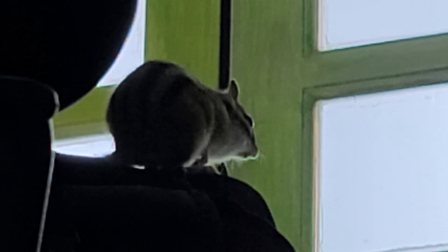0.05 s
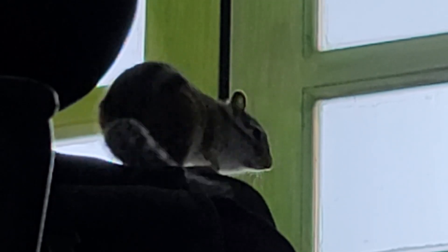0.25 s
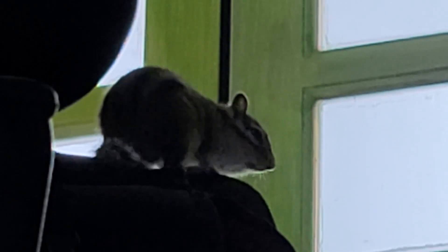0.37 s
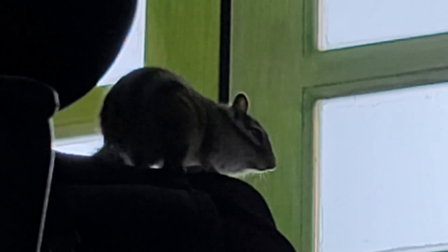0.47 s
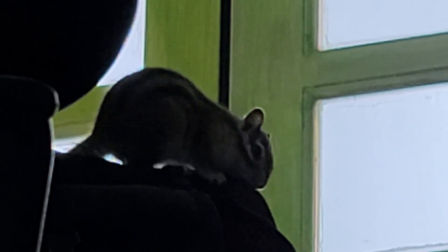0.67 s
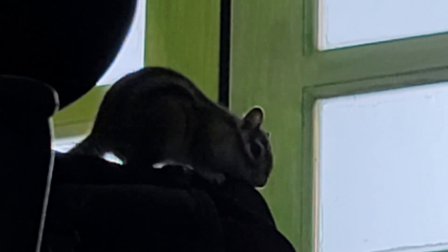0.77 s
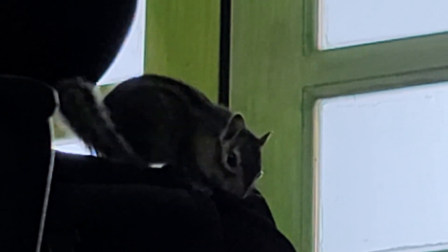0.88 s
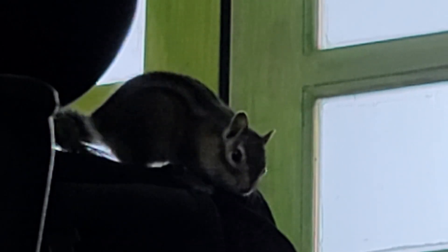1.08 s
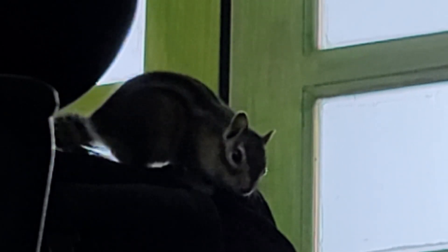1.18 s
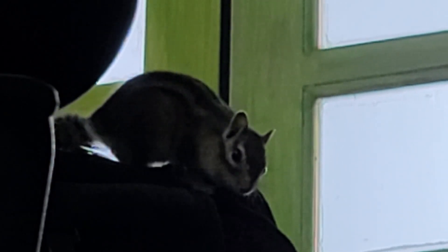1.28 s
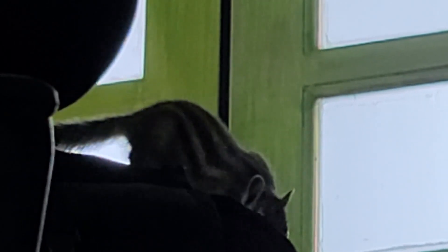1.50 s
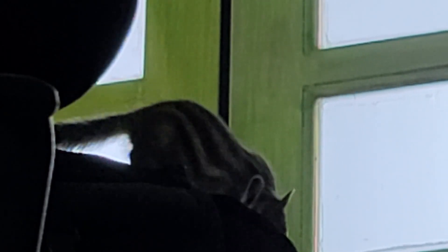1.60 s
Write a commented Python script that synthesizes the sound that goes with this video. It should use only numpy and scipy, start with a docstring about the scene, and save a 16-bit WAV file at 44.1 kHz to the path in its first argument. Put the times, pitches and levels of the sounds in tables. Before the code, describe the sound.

A chipmunk gives one abrupt alarm call, a quick high chip running into a louder, lower chuck that rings briefly in a small room. A faint soft pat follows later, over steady hiss and low hum.

```python
"""A very fast falling chip, then a louder, low, pure chuck: one alarm call of a chipmunk on a chair.
Both notes are falling whistles that ring on in a small, bare room as wall echoes and reverberation.
Later a paw pats the upholstery, a short damped thump. Faint hiss, low rumble and mains hum lie beneath."""
import sys
import numpy as np
from scipy import signal
from scipy.fft import rfft, irfft, next_fast_len
from scipy.io import wavfile

SR = 44100
rng = np.random.default_rng(int(sys.argv[2]) if len(sys.argv) > 2 else 0)


def generate_wav(signal):
    """Clip the signal to [-1, 1] and save it as 16-bit WAV at the path in sys.argv[1]."""
    frames = np.transpose(np.atleast_2d(signal))
    scaled = np.clip(frames, -1, 1) * 32767
    pcm = np.round(scaled).astype(np.int16)
    wavfile.write(sys.argv[1], SR, pcm)


N = 72765
TIME_S = np.arange(N) / SR


def chipmunk():
    """The high chip scatters at once; the low chuck bounces cleanly off the walls before it blurs."""
    # Each row: time in seconds, pitch in Hz, level in dB.
    chip_contour = [(.2075, 6910, -38), (.2108, 6337, -25.5), (.213, 5110, -23), (.215, 4730, -24),
                    (.2205, 4090, -21), (.2245, 3590, -23.5), (.230, 3055, -30.5)]
    chuck_contour = [(.2615, 1345, -42), (.265, 1320, -13.5), (.269, 1245, -8), (.275, 1200, -7.5),
                     (.282, 1177, -9.5), (.2875, 1089, -15.5), (.2945, 973, -14), (.304, 892, -38)]
    # Each entry: gain of one harmonic in dB at the note's peak, fundamental first.
    chip_harmonics_db = [0, -14.5, -3, -14]
    chuck_harmonics_db = [-1, -38.5]
    # Microphone response to the animal. Each row: frequency in Hz, left gain in dB, right gain in dB.
    mic_response = [(800, -1, 3.5), (1500, -0.5, -3.5), (2390, 2.5, 2), (2800, -16.5, -19.5),
                    (4040, 2, -4.5), (5560, -0.5, -10.5), (6680, 9.5, -1), (7180, -11, 2.5),
                    (8100, -30, -14), (9100, -18, 1.5), (9000, -7, 3), (12600, 2, -5.5), (13400, -5, -11),
                    (14100, -1, -12), (15400, -13, -18.5)]
    chip = whistle(chip_contour, chip_harmonics_db, waver=0.012)
    chip = in_room(chip, direct_db=(-6, -6), echo_db=-15, reverb_db=5.5, gap_s=0.002, build_s=0.0013)
    chuck = whistle(chuck_contour, chuck_harmonics_db, waver=0.002)
    chuck = in_room(chuck, direct_db=(0.5, -9), echo_db=-1, reverb_db=-4, gap_s=0.018, build_s=0.056)
    left, right = chip + chuck
    return np.array([colour(left, mic_response, column=1), colour(right, mic_response, column=2)])


def whistle(contour, harmonics_db, waver, waver_s=0.00063, fade_s=0.0021, brightening=0.7):
    """One gliding note with a slightly unsteady pitch, brighter where it is louder."""
    knots_s, knots_hz, knots_db = np.transpose(contour)
    jitter = signal.lfilter([1], [1, -np.exp(-1 / (waver_s * SR))], rng.standard_normal(N))
    pitch_hz = np.interp(TIME_S, knots_s, knots_hz) * (1 + waver * jitter / np.std(jitter))
    phase = 2 * np.pi * np.cumsum(pitch_hz) / SR
    level_db = np.interp(TIME_S, knots_s, knots_db)
    overtone_db = brightening * (level_db - knots_db.max())
    tone = sum(from_db(db + overtone_db * (k > 1)) * np.sin(k * phase) * (k * pitch_hz < SR / 2)
               for k, db in enumerate(harmonics_db, 1))
    inside_s = np.minimum(TIME_S - knots_s[0], knots_s[-1] - TIME_S)
    gate = np.clip(inside_s / fade_s + 1, 0, 1)
    return tone * gate * from_db(level_db)


def in_room(x, direct_db, echo_db, reverb_db, gap_s, build_s):
    """Direct sound (left, right), wall reflections and reverberation at two microphones."""
    # Each row: delay in seconds, left and right gain in dB relative to echo_db.
    reflections = [(0.0106, -34, 2), (0.0131, 0, 0), (0.0316, -1.5, -5), (0.0529, -4, -10),
                   (0.0609, -24, -5.5), (0.0837, -21, -16)]
    direct = from_db(direct_db)[:, None] * x
    echoes = sum(from_db([[left_db], [right_db]]) * np.interp(TIME_S - delay_s, TIME_S, x)
                 for delay_s, left_db, right_db in reflections)
    diffuse = np.array([reverberation(x, gap_s, build_s) for _ in range(2)])
    return direct + from_db(echo_db) * echoes + from_db(reverb_db) * diffuse


def reverberation(x, gap_s, build_s):
    """Dense reflections that build up after a gap and die faster in the treble; same rms as x."""
    # Each row: frequency in Hz, time to decay by 60 dB in seconds.
    room_t60 = [(950, 0.39), (1250, 0.35), (3400, 0.32), (4100, 0.34), (5400, 0.28), (6600, 0.33),
                (12000, 0.23)]
    edges_hz = np.geomspace(500, 18000, 15)
    hz = np.fft.rfftfreq(N, 1 / SR)
    white = rfft(rng.standard_normal(N))
    tail = np.zeros(N)
    for low_hz, high_hz in zip(edges_hz, edges_hz[1:]):
        band = irfft(white * (hz >= low_hz) * (hz < high_hz), N)
        t60_s = at_hz(room_t60, np.sqrt(low_hz * high_hz))
        tail += band * from_db(-60 * TIME_S / t60_s)
    onset = np.clip((TIME_S - gap_s) / build_s, 0, 1)
    wet = signal.fftconvolve(x, tail * onset)[:N]
    return wet * np.std(x) / np.std(wet)


def paw(start_s=1.161, level_db=-31.5, pitch_hz=250, t60_s=0.0097):
    """A soft, dead pat on the upholstery: one heavily damped sine."""
    age_s = np.maximum(TIME_S - start_s, 0)
    return -from_db(level_db - 60 * age_s / t60_s) * np.sin(2 * np.pi * pitch_hz * age_s)


def room_tone(side_db=-13, drift_scale=0.38):
    """Steady hiss, unrelated left and right, over rumble and mains hum with a slow chance waver in level."""
    # Each row: frequency in Hz, left and right density in dB per Hz.
    hiss_spectrum = [(120, -85, -81), (250, -92, -88), (554, -77.5, -80), (780, -75.5, -85.5),
                     (1055, -77.5, -88.5), (1210, -73, -87), (1894, -79, -95), (2300, -90, -99),
                     (2830, -82.5, -98.5), (2980, -86.5, -100), (4460, -93, -105), (4820, -90, -106),
                     (5680, -98, -112), (6530, -89.5, -119), (7260, -96, -118), (8100, -115, -115),
                     (9340, -104, -109), (10480, -107, -107), (11900, -94.5, -105.5), (13100, -97.5, -108),
                     (14000, -103, -109), (16000, -103, -110)]
    # Each row: frequency in Hz, density in dB per Hz before the drift.
    rumble_spectrum = [(12, -78), (30, -66), (44, -62), (59, -60.5), (72, -61), (90, -67), (110, -75.5),
                       (160, -78.5), (250, -82.5), (500, -82.5), (1000, -90.5), (3000, -125)]
    # Each row: frequency in Hz, rms level in dB before the drift.
    hum_partials = [(60, -44.5), (120, -58.5)]
    # Each row: time in seconds, level in dB; drift_scale scales its departure from the mean.
    random_level_drift = [(0.03, -37), (0.176, -46.5), (0.458, -42.5), (0.52, -54), (0.632, -42.5),
                          (0.786, -47.5), (1.606, -37.5), (1.62, -37.5)]
    hiss = np.array([noise(hiss_spectrum, column=1), noise(hiss_spectrum, column=2)])
    rumble_mid = noise(rumble_spectrum)
    rumble_side = from_db(side_db) * noise(rumble_spectrum) * [[1], [-1]]
    hum = sum(np.sqrt(2) * from_db(db) * np.sin(2 * np.pi * (hz * TIME_S + rng.random()))
              for hz, db in hum_partials)
    drift = np.interp(TIME_S, *np.transpose(random_level_drift))
    drift_gain = from_db(drift_scale * (drift - drift.mean()))
    return hiss + (rumble_mid + rumble_side + hum) * drift_gain


def noise(spectrum, column=1):
    """Steady noise with a tabled density in dB per Hz."""
    gain = from_db(at_hz(spectrum, np.fft.rfftfreq(N, 1 / SR), column))
    return irfft(rfft(rng.standard_normal(N)) * gain, N) * np.sqrt(SR / 2)


def colour(x, response, column):
    """Minimum-phase filter that follows a table of dB against Hz."""
    size = 2 * next_fast_len(N)
    gain = from_db(at_hz(response, np.fft.rfftfreq(size, 1 / SR), column))
    cepstrum = irfft(np.log(gain))
    cepstrum[1:size // 2] *= 2  # fold onto positive time: causal
    cepstrum[size // 2 + 1:] = 0
    return irfft(rfft(x, size) * np.exp(rfft(cepstrum)))[:N]


def at_hz(rows, hz, column=1):
    """One table column, interpolated over log frequency."""
    table = np.array(rows)
    return np.interp(np.log(np.maximum(hz, 1)), np.log(table[:, 0]), table[:, column])


def from_db(db):
    """Decibels to gain."""
    return 10 ** (np.asarray(db) / 20)


def scene():
    """Call and pat over the room tone, in stereo."""
    return room_tone() + chipmunk() + paw()


def record(dry, cutoff_hz=15800):
    """Steep elliptic low-pass on the top treble."""
    return signal.sosfilt(signal.ellip(12, 0.1, 80, cutoff_hz, fs=SR, output="sos"), dry)


dry = scene()
out = record(dry)
generate_wav(out)
```